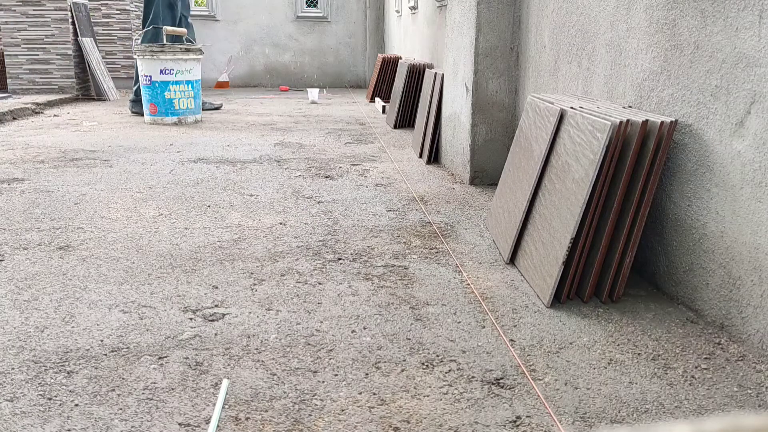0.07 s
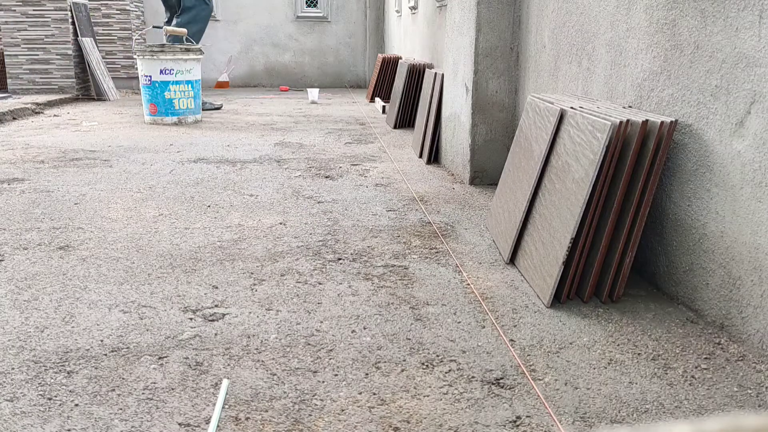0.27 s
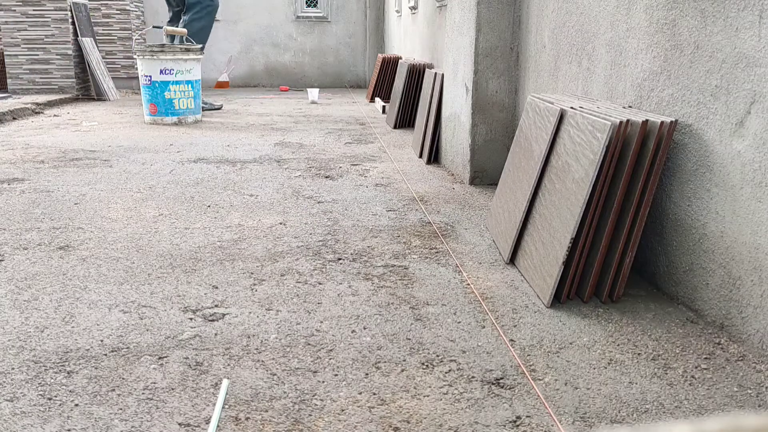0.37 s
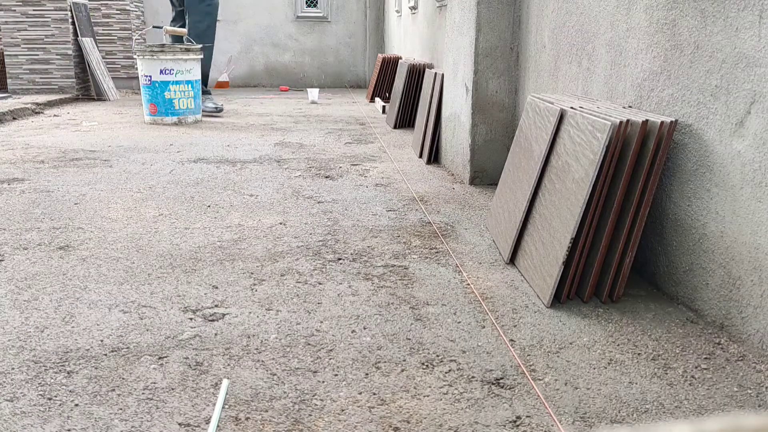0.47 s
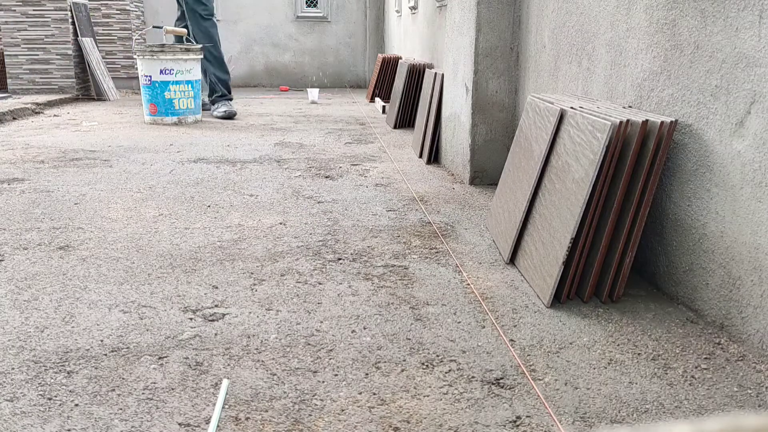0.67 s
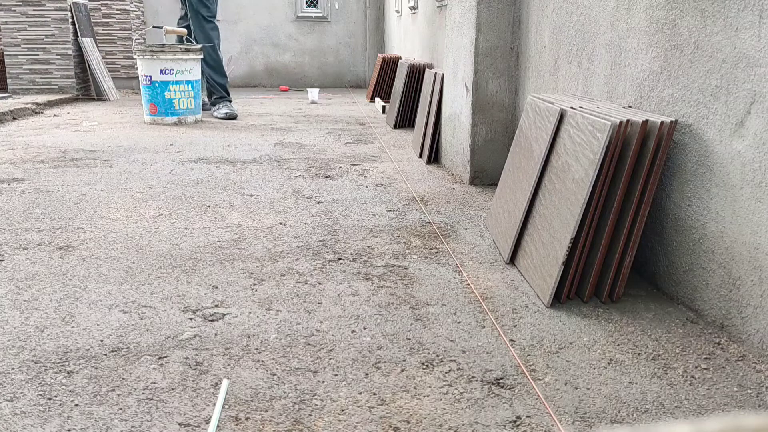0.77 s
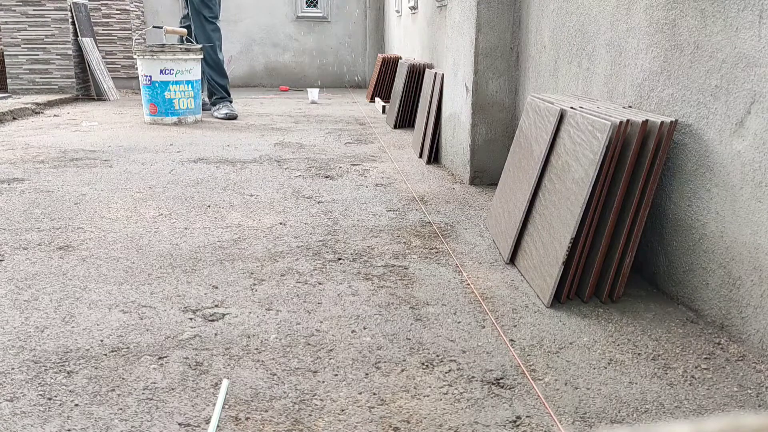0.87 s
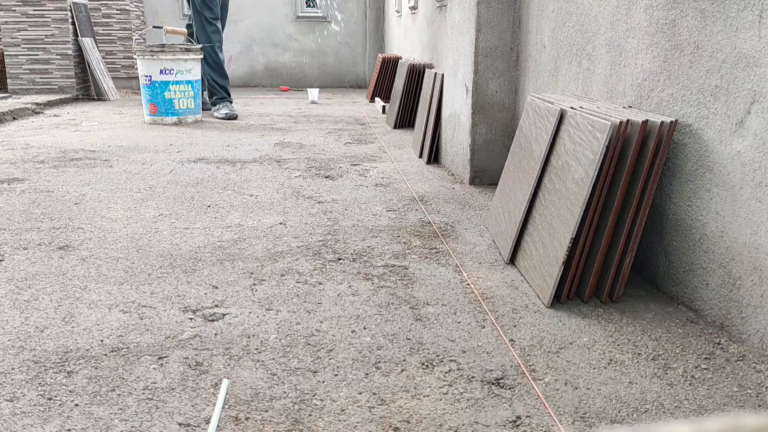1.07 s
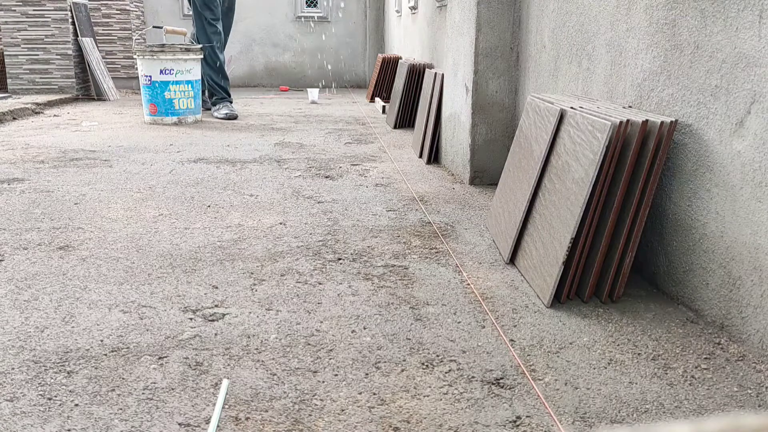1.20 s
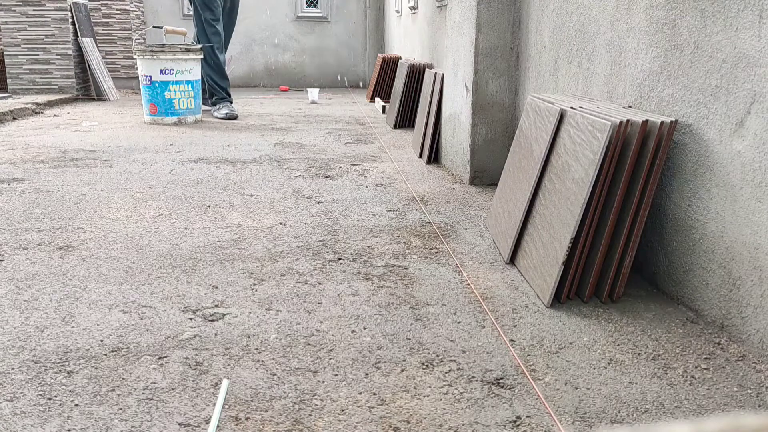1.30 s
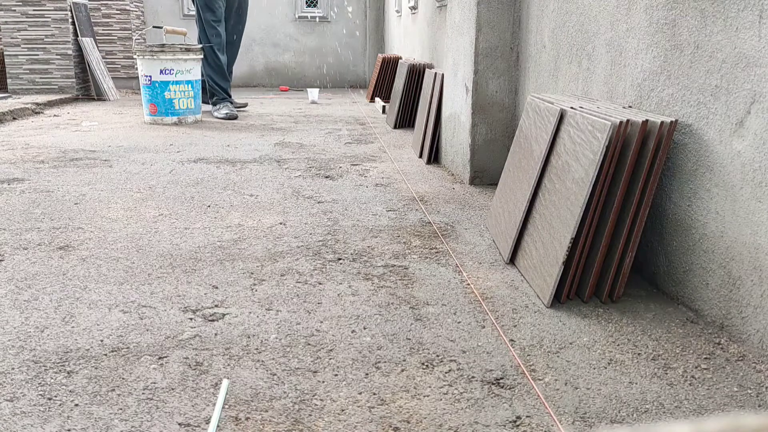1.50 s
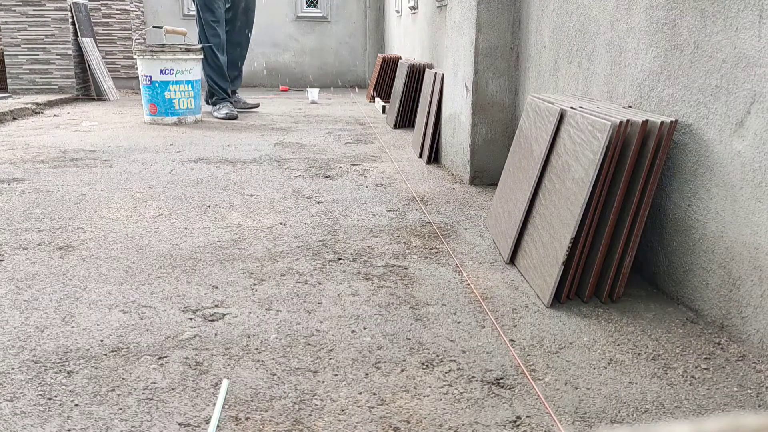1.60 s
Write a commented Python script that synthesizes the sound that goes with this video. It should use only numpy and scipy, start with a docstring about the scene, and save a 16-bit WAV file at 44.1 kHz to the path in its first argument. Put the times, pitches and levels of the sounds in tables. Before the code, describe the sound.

A plastic bucket is set down on concrete at about 0.2 seconds, after a faint shuffle: one sharp clack and hollow thud, echoing between bare walls for about half a second. From 0.7 seconds shoes scuff on grit, much quieter than the knock, with small hard ticks and taps around 1.1, 1.3 and 1.5 seconds. Faint outdoor hiss and a low distant drone continue throughout.

```python
"""A plastic bucket is set down on concrete between bare walls: the rim clacks, the base thuds flat.
Each contact cracks and rings the shell's modes; the yard echoes it and the strongest tones linger.
Shoes scuff on grit, faintly before and louder after, with a few small hard ticks.
Under it all: a low distant drone and the faint hiss of outdoor air."""
import sys
import numpy as np
from scipy import signal
from scipy.fft import rfft, irfft
from scipy.io import wavfile

SR = 44100
rng = np.random.default_rng(int(sys.argv[2]) if len(sys.argv) > 2 else 0)


def transcribe(u):
    """Save the signal u as a 16-bit wav file named by the first command-line argument.

    u: samples, shape (n,) or (channels, n), limited to [-1, 1]; the rate is SR.
    q: integer samples, one column per channel.
    """
    v = np.clip(np.atleast_2d(u).T, -1, 1)
    q = np.round(v * 32767).astype(np.int16)
    wavfile.write(sys.argv[1], SR, q)


N = 72765


def undb(db):
    """Decibels to gain."""
    return 10 ** (np.asarray(db) / 20)


def clock():
    """Sample times in seconds."""
    return np.arange(N) / SR


def bins():
    """Bin frequencies in Hz."""
    return np.arange(N // 2 + 1) * SR / N


def along(points, hz):
    """Interpolate (Hz, value) points on a log-frequency axis."""
    p = np.array(points, float)
    return np.interp(np.log(np.maximum(hz, 1)), np.log(p[:, 0]), p[:, 1])


def unit(x):
    """Scale to rms 1."""
    return x / np.sqrt(np.mean(x ** 2))


def colour(x, points):
    """Shape a spectrum by (Hz, dB) points, keeping the power of white noise."""
    return irfft(rfft(x) * unit(undb(along(points, bins()))), N)


def noise(points):
    """Coloured noise, rms about 1."""
    return colour(rng.standard_normal(N), points)


def walk(hz):
    """Random motion below about hz, rms 1."""
    return unit(irfft(rfft(rng.standard_normal(N)) * np.exp(-(bins() / hz) ** 2), N))


def delay(x, lag_s):
    """Fractional delay."""
    return irfft(rfft(x, 2 * N) * np.exp(-1j * np.pi * np.arange(N + 1) * SR / N * lag_s))[:N]


def fade(start_s, t60_s):
    """Sudden start, exponential decay."""
    age_s = clock() - start_s
    return (age_s >= 0) * np.exp(-np.log(1000) * np.maximum(age_s, 0) / t60_s)


def ring(start_s, hz, t60_s, phase=0):
    """One decaying mode."""
    return fade(start_s, t60_s) * np.sin(2 * np.pi * hz * (clock() - start_s) + phase)


def echo(x, response):
    """Convolve with a left and a right response."""
    return signal.fftconvolve(x[None], response, axes=1)[:, :N]


def direct(x, lag_s=0.0004634, right_db=-0.5):
    """Direct sound reaches the left microphone first."""
    return np.array([x, undb(right_db) * delay(x, lag_s)])


def diffuse(spacing_s=0.0005):
    """Spectra of sound from all sides at two spaced microphones: alike in the bass only."""
    coherence = .96 * np.sinc(2 * bins() * spacing_s)
    mid, side = rfft(rng.standard_normal((2, N)))
    mid, side = mid * np.sqrt(1 + coherence), side * np.sqrt(1 - coherence)
    return np.array([mid + side, mid - side]) / np.sqrt(2)


def air(level_db=-46.5, wander_db=3):
    """Outdoor air: diffuse rumble and hiss, slowly wandering in level."""
    # Each row: frequency in Hz, relative density in dB.
    spectrum = [(25, -1), (40, -34), (55, 4.5), (75, -2), (115, 0.5), (170, -3), (280, -10.5), (600, -14.5),
                (1600, -17.5), (2800, -23), (6500, -28.5), (7700, -33), (8700, -31.5), (15000, -37.5)]
    return colour(irfft(diffuse(), N), spectrum) * undb(level_db + wander_db * walk(hz=1.3))


def drone(hz=112, width_hz=10.7, level_db=-52.5):
    """Distant wavering drone: a narrow band of noise."""
    phase = 2 * np.pi * hz * clock()
    return undb(level_db) * unit(walk(width_hz) * np.sin(phase) + walk(width_hz) * np.cos(phase))


def shoes(rough_db=3, rough_hz=750):
    """Soles pat and scrape the floor, rolling grains of grit; the stride swishes softly."""
    # Each row: peak time, rise and decay constants in seconds; sole, scrape, grit, swish levels in dB.
    scuffs = [(.05, 0.16, 0.15, -62.5, -60.5, -58.5, -53.5), (.11, 0.071, 0.068, -50, -62.5, -69, -74),
              (0.658, 0.025, 0.2, -57.5, -53, -59.5, -57), (.855, 0.0069, 0.031, -58, -48, -50.5, -57.5),
              (0.999, 0.007, 0.0057, -36.5, -56.5, -41.5, -61),
              (1.099, 0.0049, 0.015, -35.5, -39.5, -55, -72), (1.159, 0.011, 0.026, -45, -78, -70, -57),
              (1.28, 0.0074, 0.054, -58, -79, -65.5, -55.5), (1.429, 0.049, 0.036, -99, -71, -67, -54),
              (1.486, 0.013, .025, -47, -44, -62, -56), (1.551, 0.017, 0.043, -57, -48.5, -40.5, -47)]
    # Spectra of the four parts. Each row: frequency in Hz, relative level in dB.
    sole = [(120, -36.5), (250, -7.5), (355, 6), (480, -3), (750, -1), (1200, -6), (4000, -37)]
    scrape = [(400, -4), (1100, 15), (1600, 15.5), (2250, -6), (2900, 0.5), (3900, -10), (8000, -44.5)]
    grit = [(800, -20), (1800, 2), (2350, 7), (2900, -1.5), (3500, 7.5), (3850, 3.5), (4700, -5), (5800, 1),
            (7600, -30.5), (9000, -5), (15000, -39)]
    swish = [(800, -18), (2500, -18.5), (6500, 3), (7700, 4.5), (8800, 4), (12000, 1.5), (15000, 0.5)]
    parts = [noise(sole)]
    for spectrum in (scrape, grit, swish):
        parts.append(noise(spectrum) * unit(undb(rough_db * walk(rough_hz))))
    t, out = clock(), 0
    for peak_s, rise_s, decay_s, *levels_db in scuffs:
        envelope = np.exp(-np.maximum((peak_s - t) / rise_s, (t - peak_s) / decay_s))
        out = out + envelope * (undb(levels_db) @ np.array(parts))
    return out


def yard(delay_s=0.0072, build_s=0.0055):
    """Wall response: a dense tail that builds quickly; the treble dies before the mids."""
    # Each row: frequency in Hz, t60 in seconds.
    decays = [(120, 0.03), (500, 0.76), (1500, 0.65), (3000, 0.5034), (7000, 0.5), (14000, 0.46)]
    # Each row: frequency in Hz, relative level in dB.
    spectrum = [(100, -3), (300, 0.5), (600, -2), (1500, 0), (3000, -4), (8000, 0.5), (15000, 5)]
    field, tail = diffuse(), 0
    for band_hz, t60_s in decays:
        band = along([(hz, hz == band_hz) for hz, _ in decays], bins())
        tail = tail + irfft(field * band, N) * fade(0, t60_s)
    build = 1 - np.exp(-np.maximum(clock() - delay_s, 0) / build_s)
    return unit(colour(tail, spectrum) * build) / np.sqrt(N)


def bucket(paths, shell_db=-21, crack_db=-8, crack_t60_s=.022, scatter=0.2):
    """Each contact cracks and rings the shell; the base lands softly and drives mainly the low modes."""
    # Each row: start in seconds, blow level in dB, hardness as cut-off in Hz, relative crack level
    # in dB, send to the walls in dB, right-side lag in seconds.
    contacts = [(0.2007, -17.5, 3870, -6.5, 6.5, 0.00047), (0.2039, -5, 4100, -1.5, 4, 0.0006),
                (0.2084, -0.5, 3460, -4, 1, 0.000493), (0.2113, -15, 2530, -8.5, 8, 0.00059),
                (0.2241, 9, 766, -29, -4, 0.00019)]
    # Each row: frequency in Hz, relative level in dB, t60 in seconds.
    modes = [(282, -11, .12), (331, -11, .11), (531, 1.5, .12), (585, -3, .05), (648, -7, .08),
             (695, -4, .1), (753, .5, .09), (1003, -4.5, .09), (1340, -5, .05), (1484, 5, .14),
             (1528, -2, .1), (1756, -1, .08), (1880, 3.5, .07), (2185, 6.5, .05), (2340, 3, .06)]
    # Each row: frequency in Hz, relative level in dB.
    crack_spectrum = [(100, -22), (300, -4.5), (1200, 4), (2400, 0), (3200, -2.5), (6200, -11), (7700, -17),
                      (8800, -13), (13000, -19.5), (15500, -36)]
    shell = np.array([undb(shell_db + db) * ring(0, hz, t60_s, np.pi / 2) for hz, db, t60_s in modes])
    shell = signal.sosfilt(signal.butter(4, (265, 2800), "band", fs=SR, output="sos"), shell)
    force = wall_force = crack = wall_crack = 0
    for start_s, blow_db, cutoff_hz, burst_db, send_db, lag_s in contacts:
        softness = signal.butter(2, cutoff_hz, fs=SR, output="sos")
        blow = undb(blow_db) * signal.sosfilt(softness, signal.unit_impulse(N, int(start_s * SR)))
        burst = undb(crack_db + burst_db) * fade(start_s, crack_t60_s)
        force = force + np.array([blow, delay(blow, lag_s)])
        wall_force = wall_force + undb(send_db) * blow
        crack = crack + burst
        wall_crack = wall_crack + undb(send_db) * burst
    out = echo(shell.sum(axis=0), force) + np.sqrt(1 - scatter) * direct(crack * noise(crack_spectrum))
    # The rough floor scatters a share of the crack's power to each microphone separately.
    out += np.sqrt(scatter) * crack * np.array([noise(crack_spectrum), noise(crack_spectrum)])
    # Each direction carries some modes and part of the crack to other walls.
    directions = len(paths)
    for k, walls in enumerate(paths):
        tones = signal.fftconvolve(wall_force, shell[k::directions].sum(axis=0))[:N]
        out += echo(tones + wall_crack * noise(crack_spectrum) / np.sqrt(directions), walls)
    return out


def linger(start_s=.226, waver_hz=28):
    """The strongest tones hang on between the walls, beating unevenly."""
    # Each row: frequency in Hz, level in dB, t60 in seconds.
    tones = [(279, -42, .7), (552, -34, .8), (697, -36, .6), (992, -40, .6), (1492, -31, .8)]
    out = np.zeros((2, N))
    for channel in out:
        for hz, db, t60_s in tones:
            phase = rng.uniform(0, 2 * np.pi) + walk(waver_hz)
            channel += undb(db) * ring(start_s, hz, t60_s, phase) * (1 + .5 * walk(waver_hz))
    return out


def ticks(walls, rise_s=.0009, t60_s=.026, snap_t60_s=.012, wet_db=-1):
    """Small hard ticks and heel taps: a dry bright snap and two short rounded tones that echo."""
    # Each row: start in seconds, pitch in Hz, ring level in dB, snap level in dB.
    taps = [(.752, 1500, -60, -51), (1.037, 1550, -43, -64), (1.0853, 2050, -35, -62),
            (1.099, 720, -34, -68), (1.101, 1620, -31, -58), (1.167, 1350, -54, -52),
            (1.2658, 1680, -36, -46), (1.4697, 1230, -28.5, -46)]
    # Each row: frequency in Hz, relative level in dB.
    snap_spectrum = [(2000, 1), (7000, -21), (8800, 25), (11000, -9), (15000, -10)]
    tones = snaps = 0
    for start_s, hz, ring_db, snap_db in taps:
        rise = 1 - np.exp(-np.maximum(clock() - start_s, 0) / rise_s)
        overtone = undb(-4) * ring(start_s, 1.3 * hz, t60_s / 2)
        tones = tones + undb(ring_db) * rise * (ring(start_s, hz, t60_s) + overtone)
        snaps = snaps + undb(snap_db) * fade(start_s, snap_t60_s)
    return tones + snaps * noise(snap_spectrum) + undb(wet_db) * echo(tones, walls)


def scene():
    """Bucket, shoes and ticks between the walls, over air and drone."""
    paths = [yard() for _ in range(4)]  # one per direction
    steps = shoes()
    feet = direct(steps) + undb(-3) * echo(steps, paths[0])
    return bucket(paths) + linger() + feet + ticks(paths[1]) + air() + drone()


def record(dry, ceiling=.92, top_hz=15600):
    """Round the highest peaks, then cut the top."""
    limited = dry / (1 + (dry / ceiling) ** 6) ** (1 / 6)
    return signal.sosfilt(signal.ellip(8, .2, 80, top_hz, fs=SR, output="sos"), limited)


dry = scene()
out = record(dry)
transcribe(out)
```